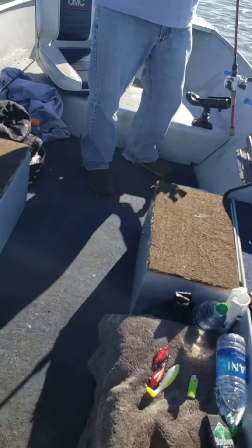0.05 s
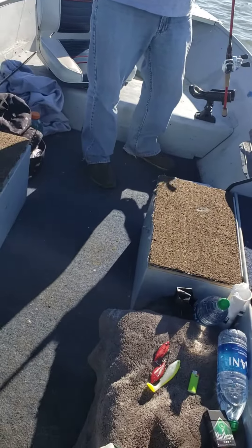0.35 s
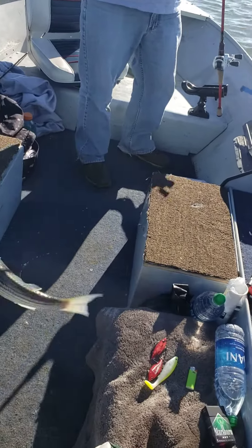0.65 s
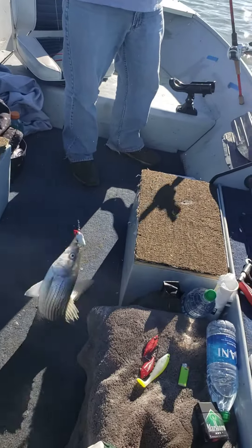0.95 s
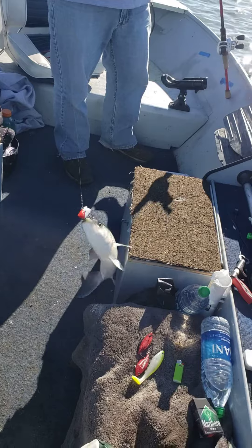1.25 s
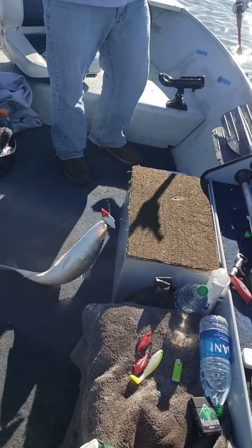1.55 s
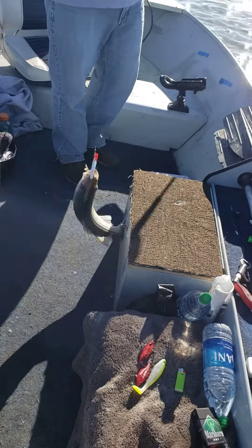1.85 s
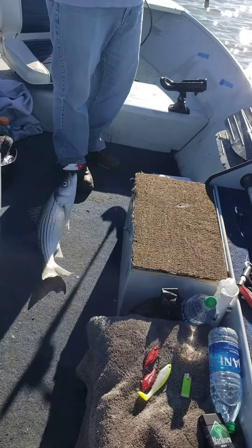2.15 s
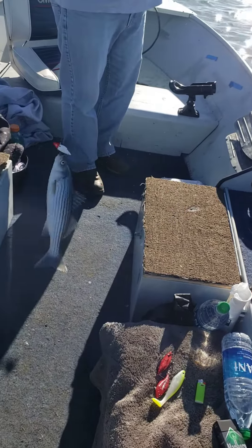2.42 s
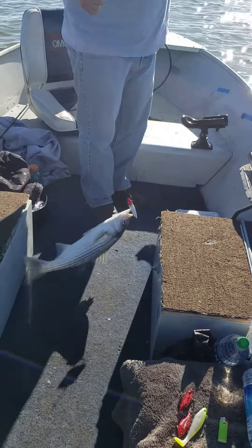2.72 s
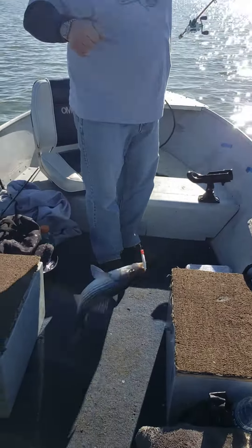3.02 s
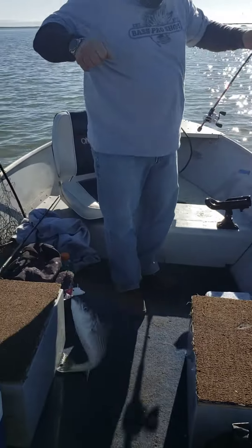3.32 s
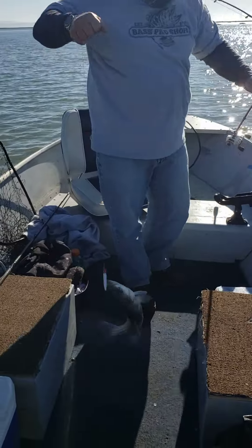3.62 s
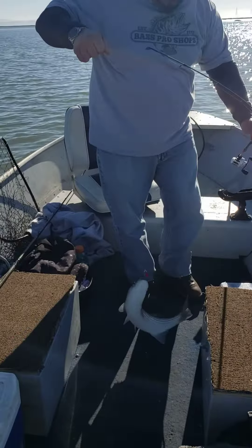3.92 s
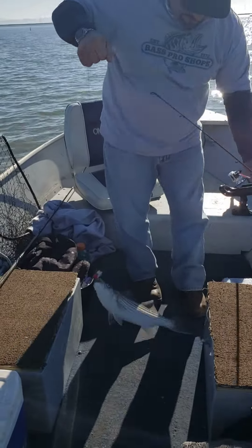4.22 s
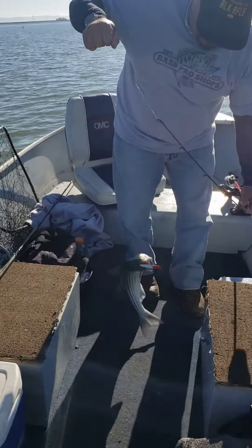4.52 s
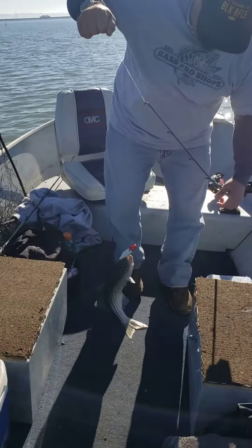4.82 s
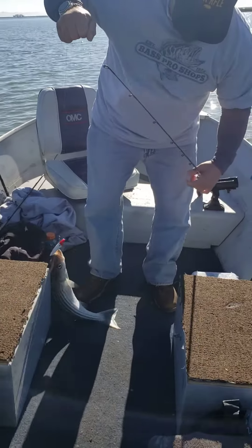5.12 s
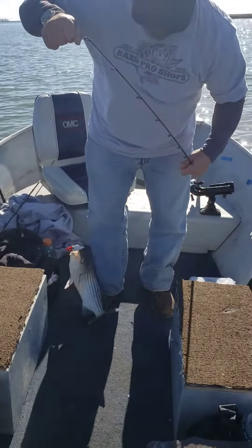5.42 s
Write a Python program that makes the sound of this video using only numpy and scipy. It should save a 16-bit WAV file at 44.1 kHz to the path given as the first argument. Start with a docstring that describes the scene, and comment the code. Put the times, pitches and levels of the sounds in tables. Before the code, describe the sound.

A hooked fish flops close by on the carpeted deck of a small metal boat, over a low, steady wash of wind and water. From the start, beads inside a hollow lure rattle in bright, uneven bursts, with sharp clicks and a faint ring of steel hooks. Around 0.3 to 0.5 seconds the rattle flares with quick knocks and a sharp wet tail smack. More knocks and slaps follow near 0.9 and 1.4 seconds, with a smack at 1.6. Deeper thumps land between 2.1 and 2.4 seconds. The heaviest pair comes at about 2.8 and 2.9, with hard clicks from the lure. The rattle continues in fits, with a hollow bump against a seat box at 4 seconds and a light knock near 4.6. It eases around 5 seconds, then flurries again from 5.3, with a few last knocks and slaps near 5.6.

```python
"""On the carpeted deck of a small metal boat, a hooked fish flops with a hollow rattle lure in its mouth.
Thrashes and flicks drive beads against the lure's shell, exciting its modes, and jangle its steel hooks.
Wind and water make a low, steady wash of noise around the hull. The body's impacts set the deck and the
seat boxes into damped vibration, and wet flank and tail slap out short bursts of noise."""
import sys
import numpy as np
from scipy import signal
from scipy.fft import rfft, irfft, next_fast_len
from scipy.io import wavfile
from scipy.ndimage import uniform_filter1d, map_coordinates

SR = 44100
rng = np.random.default_rng(int(sys.argv[2]) if len(sys.argv) > 2 else 0)


def int16_out(signal):
    """Quantize to a 16-bit WAV file."""
    q = np.round(np.clip(np.atleast_2d(signal).T, -1, 1) * 32767)
    wavfile.write(sys.argv[1], SR, q.astype(np.int16))


N = 250047

# Levels in the tables are relative; a t60 is the time to decay by 60 dB.
# Thrashes that keep the beads tumbling. Each row: start in seconds, length in seconds, level in dB.
THRASHES = [(0.0, 0.14, -32.5), (0.168, 0.056, -30.5), (0.249, 0.055, -26.5), (0.339, 0.064, -33),
            (0.436, 0.067, -23), (0.669, 0.041, -29), (0.737, 0.06, -34), (0.804, 0.028, -32),
            (0.981, 0.047, -24), (1.054, 0.03, -39), (1.143, .14, -43.5), (1.323, 0.032, -36.5),
            (1.361, 0.29, -34.5), (1.63, 0.056, -27.5), (1.812, 0.098, -34.5), (1.947, 0.024, -33),
            (2.061, 0.082, -41), (2.144, 0.065, -28), (2.352, 0.082, -28), (2.472, 0.08, -38.5),
            (2.627, .13, -44.5), (2.904, 0.054, -26.5), (2.988, 0.094, -35), (3.142, 0.07, -38.5),
            (3.272, 0.047, -30), (3.335, 0.077, -40.5), (3.443, 0.092, -34), (3.58, 0.022, -35),
            (3.669, 0.035, -28), (3.73, 0.035, -35.5), (3.844, 0.088, -38), (3.985, 0.092, -34.5),
            (4.142, 0.034, -32), (4.245, 0.036, -34), (4.349, 0.011, -31.5), (4.515, 0.032, -34.5),
            (4.601, 0.034, -31.5), (4.662, 0.08, -42.5), (4.897, 0.22, -43.5), (5.125, 0.12, -35.5),
            (5.245, 0.019, -24.5), (5.322, 0.034, -28.5), (5.387, 0.075, -24), (5.564, 0.016, -28),
            (5.622, 0.014, -30)]
# Flicks that throw the beads all at once. Each row: start in seconds, length in seconds, level in dB.
FLICKS = [(.003, 0.0047, -26), (0.085, 0.0027, -23), (0.132, .002, -29), (0.176, .004, -23),
          (0.247, 0.017, -22.5), (0.268, 0.0037, -13), (0.302, .002, -26), (.342, .003, -32),
          (0.421, 0.0041, -19), (0.447, .0035, -23.5), (0.469, 0.0038, -15.5), (0.479, .004, -18.5),
          (0.492, 0.0046, -20), (0.552, .0017, -24.5), (0.565, 0.003, -22.5), (0.573, 0.0019, -30),
          (0.584, .001, -34), (0.613, 0.0026, -23.5), (0.621, 0.0068, -24), (0.68, 0.0036, -32),
          (.696, .002, -31), (0.724, 0.0049, -18.5), (0.744, 0.0044, -23), (0.774, 0.009, -25),
          (0.806, .003, -27.5), (0.832, .003, -41), (.887, .0017, -36), (0.912, .002, -38),
          (0.92, .002, -34.5), (0.939, .002, -30), (0.981, 0.0081, -18.5), (1.012, .006, -30),
          (1.146, .002, -35), (1.156, .007, -29.5), (1.262, .002, -38.5), (1.31, .002, -45),
          (1.369, 0.0086, -24), (1.425, .003, -28), (1.544, .002, -50), (1.575, 0.0054, -26.5),
          (1.625, .003, -27), (1.652, .004, -22), (1.819, 0.0049, -26.5), (1.831, .0005, -26),
          (1.856, 0.004, -22), (1.885, 0.0023, -25), (1.953, .001, -30.5), (1.974, .007, -25),
          (2.08, .003, -28), (2.108, .002, -29), (2.152, .004, -25), (2.247, 0.014, -24.5),
          (2.343, 0.0046, -27), (2.381, 0.0045, -26.5), (2.432, 0.0036, -25), (2.475, .002, -33),
          (2.497, .002, -35), (2.532, .004, -34), (2.732, 0.0034, -38), (2.844, 0.0056, -31.5),
          (2.858, 0.0053, -13.5), (2.918, 0.0019, -9.5), (2.974, 0.0037, -25.5), (3.02, .002, -34.5),
          (3.069, 0.0026, -23.5), (3.172, 0.0081, -22.5), (3.272, .002, -25.5), (3.282, .005, -21.5),
          (3.472, .004, -25.5), (3.508, 0.0038, -25.5), (3.664, 0.003, -27), (3.69, 0.0031, -29.5),
          (3.846, .002, -39), (3.89, 0.0043, -27.5), (3.983, .002, -40), (4.014, 0.004, -15.5),
          (4.043, 0.0026, -20), (4.14, .002, -33), (4.164, .004, -24.5), (4.251, .002, -37),
          (4.347, 0.0027, -29), (4.368, 0.0046, -26.5), (4.419, 0.0022, -33), (4.483, .001, -42.5),
          (4.52, 0.0027, -37.5), (4.608, .003, -26), (4.697, .002, -39), (4.721, 0.0045, -27.5),
          (5.033, .002, -35.5), (5.115, 0.0024, -35.5), (5.246, .003, -33), (5.322, 0.0028, -21.5),
          (5.39, .005, -19), (5.398, .003, -24), (5.415, 0.0059, -14), (5.431, .004, -21.5),
          (5.444, 0.0048, -20), (5.504, 0.0047, -29), (5.544, 0.0059, -18), (5.587, 0.0027, -21.5),
          (5.619, 0.0046, -23.5)]
# Weightless moments when the beads fly free. Each row: middle in seconds, length in seconds.
FREE_FLIGHTS = [(0.537, 0.029), (0.596, 0.014), (0.72, 0.01), (0.885, 0.016), (1.127, 0.025),
                (1.753, 0.047), (2.334, 0.011), (3.249, 0.013), (3.441, 0.0081), (3.783, 0.033),
                (3.965, 0.012), (4.105, 0.0045), (4.229, 0.0082), (4.34, 0.018), (4.466, 0.011),
                (5.103, 0.096), (5.285, 0.033), (5.538, 0.0083)]
# The lure shell's modes in four groups, low to high. Each row: frequency in Hz, width in Hz, level in dB.
HOLLOW_MODES = [(2120, 670, -7), (3220, 1700, -4.5), (4870, 5400, 5.5)]
DEEP_MODES = [(5620, 650, -6), (5910, 570, -2.5), (6370, 440, -2), (7080, 470, 3), (7385, 500, 2)]
MAIN_MODES = [(9006, 490, -12), (9520, 1100, -14.5), (10746, 920, -9), (11155, 360, 0), (11340, 260, -2.5),
              (11700, 630, 2), (12160, 440, -1.5), (12560, 450, -8), (12830, 490, -1.5)]
TOP_MODES = [(13400, 1200, -1.5), (14740, 390, 1), (14400, 790, 0), (15550, 420, -10)]
# The shell's timbre as the lure turns. Each row: time in seconds, then the weights of the hollow, deep
# and top modes in dB against the main modes.
SHELL_TIMBRE = [(0.06, -24.5, -11.5, -18), (0.19, -16, -1.5, -8), (0.27, -18, -9.5, -11),
                (0.47, -21, -6.5, -6), (0.565, -30, -8.5, -13), (0.62, -17, -6, -7.5),
                (0.69, -21, -9.5, -8), (0.79, -25, -4.5, -7), (1.07, -23, -10, -6), (2.19, -19, -7, -8.5),
                (2.26, -18.5, -2.5, -4.5), (2.37, -23, -6, -7), (2.7, -14.5, -6.5, -7),
                (2.865, -29.5, -11.5, -16), (3.29, -20, -8.5, -13.5), (3.49, -14, -4, -8.5),
                (4.017, -44, -11, -18), (4.16, -23, -12.5, -21), (4.37, -34, -11.5, -16),
                (4.53, -22.5, -7.5, -13), (4.72, -20, -9, -12), (5.16, -21.5, -7.5, -11),
                (5.34, -31, -15.5, -11), (5.55, -22.5, -7.5, -17)]
# The steel hooks' modes. Each row: frequency in Hz, width in Hz, level in dB.
HOOK_MODES = [(1857, 33, -0.5), (2843, 27, -1), (3100, 24, 4.5), (3280, 57, 2.5), (3489, 19, 2),
              (3660, 40, 0), (4550, 38, 2.5)]
# The thin metallic ring near 3 kHz over time. Each row: time in seconds, level in dB against the rattle.
METALLIC_RING_LEVEL = [(0, -25), (1.05, -29), (1.25, -42), (2.6, -29.5), (2.9, -33.5), (3.6, -25.5),
                       (4.1, -26), (4.4, -26.5), (5.67, -30.5)]
# The spectrum of wind and water. Each row: frequency in Hz, spectral density in dB.
WASH_SPECTRUM = [(20, 11.5), (35, -14), (50, 4.5), (80, -0.5), (130, 1.5), (200, 0), (300, -9.5),
                 (480, -12.5), (750, -21.5), (1200, -27.5), (2000, -24.5), (3500, -36), (8000, -38),
                 (16000, -81)]
# The slow drift of the wash. Each row: time in seconds, level in dB.
WASH_DRIFT = [(0, -41), (.9, -41), (1.5, -39), (1.85, -41.5), (3.85, -39.5), (4.9, -42), (5.67, -38)]
# The likeness of the wash at the two ears. Each row: frequency in Hz, correlation coefficient.
WASH_COHERENCE = [(40, 0.3), (100, 0.48), (300, 0.83), (700, 0.014), (2000, 0.044)]
# The deck's low booming and higher knocking modes. Each row: frequency in Hz, level in dB, t60 in seconds.
BOOM_MODES = [(60, -14, 0.041), (86.4, 2.5, 0.13), (102, -3, 0.11)]
KNOCK_MODES = [(165.3, 4, 0.11), (203.3, 7, 0.047), (226.5, -1, 0.15), (274, -14.5, 0.27),
               (315, -1.5, 0.057), (395, -8, 0.1), (480, -15, 0.087), (717, -23, 0.17), (795, -18, 0.1),
               (893, -10.5, 0.042), (1045, -19, 0.06)]
# The body landing on the deck. Each row: start in seconds, then boom, knock and wet slap levels in dB.
BODY_LANDINGS = [(0.259, -47, -26.5, -32.5), (0.286, -25, -26, -39), (0.372, -44, -22, -50),
                 (0.402, -23.5, -24.5, -27), (0.439, -35, -28, -40), (0.463, -46, -24.5, -39),
                 (0.936, -50, -19.5, -40), (0.955, -21.5, -27, -52), (1.367, -28, -28, -44),
                 (1.413, -38, -20, -45), (1.431, -29, -26, -61), (1.475, -27.5, -27.5, -44),
                 (2.122, -8, -20, -29), (2.159, -25, -32, -60), (2.236, -18, -27, -39.5),
                 (2.401, -15.5, -25, -43.5), (2.81, -2.5, -14, -34), (2.918, -13.5, -19, -28),
                 (4.021, -48, -24.5, -34), (4.042, -52, -27.5, -51), (4.642, -37, -26.5, -54),
                 (5.245, -35, -34, -42.5), (5.57, -30.5, -20.5, -37.5), (5.591, -44, -27, -49),
                 (5.62, -50, -24.5, -59)]
# Smacks and swishes of tail and fins, and the flank scraping over the carpet. Each row: start in seconds, level
# in dB, t60 in seconds, # centre frequency in Hz, spread in octaves.
SMACKS_AND_SCRAPES = [(0.359, -17.5, 0.055, 3260, 0.73), (.365, -32, 0.23, 900, 1.3),
                      (0.402, -9, 0.014, 1880, 0.98), (0.407, -36, 0.037, 465, 0.64),
                      (0.417, -29, 0.031, 1400, 1.3), (0.934, -27.5, 0.028, 1800, 0.67),
                      (1.408, -32.5, 0.038, 1740, 0.48), (1.646, -22.5, 0.07, 1660, 1.9),
                      (2.03, -41, 0.16, 2510, 0.87), (2.13, -44.5, 0.8, 4620, 0.23), (2.24, -34, 0.091, 5050, .25),
                      (2.371, -43.5, 0.77, 4550, 0.17), (2.811, -33, 0.035, 2420, 1),
                      (2.92, -23, 0.025, 2050, 0.55), (3.739, -35, 0.067, 1410, 0.16),
                      (4.249, -48, 0.69, 2230, 1.8), (5.316, -27, 0.024, 2300, 0.16)]
# The hollow seat boxes' modes. Each row: frequency in Hz, level in dB, free t60 in seconds.
BOX_MODES = [(240, -5.5, 0.21), (335.2, -1, 0.21), (433, -9.5, 0.13), (486, 1.5, 0.053), (665, -13, 0.12),
             (769, -20.5, 0.29), (880, -15, .13), (1182, -45, 0.23)]
# The fish bumping the boxes. Each row: start in seconds, level in dB, tilt in dB per octave,
# ring time as a fraction of the free t60.
BOX_BUMPS = [(.366, -32.5, 4, .9), (.404, -35, 7, 1), (.461, -34, 3, 0.59), (1.414, -35, -9, 1),
             (2.125, -37, 0, 0.43), (2.811, -30, -1, .3), (2.92, -23, 5, .35), (4.02, -26, 0.5, 0.5),
             (4.042, -35, -5, 1), (5.572, -37.5, 4, 1), (5.592, -35, 4, 0.74)]
# Reverberation between the hull's walls. Each row: frequency in Hz, t60 in seconds.
HULL_DECAY = [(100, 0.022), (1000, 0.033), (6000, 0.18), (14000, 0.039)]


def amp(db):
    """Amplitude ratio of a level in decibels."""
    return 10 ** (np.asarray(db) / 20)


def unit(x):
    """Normalisation to an rms of 1."""
    return x / np.sqrt(np.mean(x ** 2) + 1e-20)


def along(points, hz):
    """Interpolation of (Hz, value) points on a logarithmic frequency axis."""
    f, values = np.transpose(points)
    return np.interp(np.log(hz + 1), np.log(f + 1), values)


def wobble(rate):
    """Smooth random modulation, with rate knots a second."""
    knots = rng.standard_normal(int(N * rate / SR) + 4)
    return map_coordinates(knots, [np.arange(N) * rate / SR])


def filtered(x, response):
    """Linear filtering: the spectrum is multiplied by a frequency response."""
    n = x.shape[-1]
    padded = next_fast_len(n + SR // 2)
    return irfft(rfft(x, padded) * response(np.fft.rfftfreq(padded, 1 / SR)), padded)[..., :n]


def add(track, start, sound):
    """Superposition of a sound on a track, from start seconds."""
    part = track[round(start * SR):][:len(sound)]
    part += sound[:len(part)]


def fade(t, t60):
    """Exponential decay by 60 dB in t60 seconds; the gain is 1 before t = 0."""
    return np.exp(-np.log(1000) * np.maximum(t, 0) / t60)


def local_rms(x, span_s):
    """Running rms over about span_s seconds, both channels together."""
    window = signal.windows.hann(2 * int(span_s * SR) + 1)
    power = np.mean(np.atleast_2d(x) ** 2, axis=0)
    return np.sqrt(abs(signal.fftconvolve(power, window / window.sum(), 'same')) + 1e-9)


def stray_beads(ticks_per_s=60):
    """A Poisson process: stray beads tick above the swarm, giving a power factor of mean 1."""
    ticks = (rng.random(N) < ticks_per_s / SR) * amp(4) * rng.uniform(0.77, 1.7, N)
    decay = fade(np.arange(SR // 10) / SR, t60=0.015)
    power = 1 + abs(signal.fftconvolve(ticks ** 2, decay ** 2)[:N])
    return power / power.mean()


def bead_power(clump_db=3.5, swarm_db=-1.0, settle_db=-9.5, lull_db=-20):
    """Incoherent impacts add in power: thrashes swell and settle, dip in free flight, and flicks spike."""
    t, power = np.arange(N) / SR, np.zeros(N)
    for start, length, db in THRASHES:
        near = slice(max(0, int((start - .1) * SR)), int((start + 1) * SR))
        age = t[near] - start
        rise = fade(-age, t60=0.071)
        stop = fade(age - length, t60=0.15)
        rolling_on = amp(settle_db) * fade(age - length, t60=0.59)
        power[near] += (amp(db) * rise * np.maximum(stop, rolling_on)) ** 2
    power *= stray_beads() * amp(swarm_db + clump_db * wobble(110)) ** 2  # the beads arrive in clumps
    for middle, length in FREE_FLIGHTS:
        near = abs(t - middle) < 2 * length
        dip = np.exp(-(2 * (t[near] - middle) / length) ** 2)
        power[near] *= amp(lull_db * dip) ** 2
    for start, length, db in FLICKS:
        near = slice(max(0, int((start - .1) * SR)), int((start + .2) * SR))
        age = t[near] - start
        power[near] += (amp(db) * fade(-age, t60=0.012) * fade(age - length, t60=0.033)) ** 2
    return power


def shell_ring(hits, modes, spot_db=4, turn_db=3.5, independent=0.55):
    """Modal excitation: each hit lands on another spot, so it has its own mix of modes on each side."""
    out, at = np.zeros((2, N)), np.flatnonzero(hits)
    for hz, width, db in modes:
        shared = rng.choice([-1, 1], len(at)) * amp(spot_db * rng.standard_normal(len(at)))
        separate = rng.standard_normal((2, len(at)))
        blows = np.zeros((2, N))
        blows[:, at] = hits[at] * (np.sqrt(1 - independent) * unit(shared) + np.sqrt(independent) * separate)
        mode = filtered(blows, lambda f: (1j * f * width / (hz * hz - f * f + 1j * f * width)) ** 2)
        out += unit(mode) * amp(db + turn_db * wobble(12))  # each swing favours other modes
    return unit(out)


def turning(x, patchy_db=4.5):
    """Directivity: the twisting lure radiates unevenly, so narrow patches of its spectrum flare and fade."""
    spectra = signal.stft(x, nperseg=256)[2]
    patches = uniform_filter1d(rng.standard_normal(spectra.shape[1:]), size=2, axis=0)  # across frequency
    patches = uniform_filter1d(patches, size=9, axis=1)  # across time
    return signal.istft(spectra * amp(patchy_db * unit(patches)), nperseg=256)[1][:, :N]


def hook_jangle(power):
    """Lightly damped resonance: every throw jolts the steel hooks, which ring on after it."""
    def steel(f):
        return sum(amp(db) * 1j * f * np.sqrt(width) / (hz * hz - f * f + 1j * f * width)
                   for hz, width, db in HOOK_MODES)

    rms_gain = np.sqrt(np.mean(abs(steel(np.fft.rfftfreq(N, 1 / SR))) ** 2))
    jolts = (rng.standard_normal(N) + .5 * rng.standard_normal((2, N))) * np.sqrt(power)
    ring_gain = amp(np.interp(np.arange(N) / SR, *np.transpose(METALLIC_RING_LEVEL)))
    return filtered(jolts * ring_gain, steel) / rms_gain


def lure_rattle(hits_per_s=1000, size_db=4.5, medium_db=-30.5, loss_per_db=0.12):
    """Impact excitation: beads click on the shell, brighter when they hit harder, and the hooks jangle."""
    t, power = np.arange(N) / SR, bead_power()
    times, *timbre = np.transpose(SHELL_TIMBRE)
    hollow, deep, top = (np.interp(t, times, db) for db in timbre)
    hardness_db = 10 * np.log10(power + amp(medium_db) ** 2 / 100) - medium_db
    loss_db = loss_per_db * hardness_db
    shares = amp([hollow - loss_db, deep - loss_db, np.zeros(N), top]) ** 2
    hits = (rng.random(N) < hits_per_s / SR) * amp(size_db * rng.standard_normal(N))
    out = turning(hook_jangle(power))
    groups, gains_db = (HOLLOW_MODES, DEEP_MODES, MAIN_MODES, TOP_MODES), (3.5, 2.15, 0.0, 2.2)
    for modes, db, group_power in zip(groups, gains_db, power * shares / shares.sum(0)):
        clicks = turning(shell_ring(hits, modes))
        # the beads share the energy of a throw, in a few hard hits or many soft ones
        out += amp(db) * np.sqrt(group_power) * clicks / local_rms(clicks, span_s=0.0023)
    return out


def wind_and_water(gain_db=1.97, swell_db=1, lap_db=3.0):
    """Partly coherent noise: alike at both ears in the bass, diffuse above; the low part laps unevenly."""
    def mid_and_side(hz):
        angle = np.arccos(np.clip(along(WASH_COHERENCE, hz), -1, 1)) / 2
        return amp(along(WASH_SPECTRUM, hz)) * [np.cos(angle), np.sin(angle)]

    mid, side = filtered(rng.standard_normal((2, N)), mid_and_side)
    wash = unit(np.array([mid + side, mid - side]))
    low = filtered(wash, lambda hz: 1 / (1 + (hz / 450) ** 4))
    lapping = low * amp(lap_db * wobble(35))
    drift_db = np.interp(np.arange(N) / SR, *np.transpose(WASH_DRIFT))
    return (wash - low + lapping) * amp(drift_db + gain_db + swell_db * wobble(10))


def deck_thumps(boom_attack_s=0.013, knock_attack_s=0.0053, rest_s=0.036, scatter_db=1.5, detune=0.045):
    """Damped panel modes: the soft body loads the deck slowly, so the boom swells in behind the knock."""
    out, t = np.zeros(N), np.arange(SR // 3) / SR
    pressed = fade(t - rest_s, t60=0.19)  # the body comes to rest on the panel and damps it
    for start, boom_db, knock_db, _ in BODY_LANDINGS:
        boom = sum(amp(db) * fade(t, t60) * np.sin(2 * np.pi * hz * t) for hz, db, t60 in BOOM_MODES)
        knock = np.zeros(len(t))
        for hz, db, t60 in KNOCK_MODES:
            strength, shift, phase = rng.standard_normal(3)
            tone = np.sin(2 * np.pi * (hz * (1 + detune * shift) * t + phase))
            knock += amp(db + scatter_db * strength) * fade(t, t60) * tone
        add(out, start, amp(boom_db + 1.5) * boom * pressed * (1 - np.exp(-(t / boom_attack_s) ** 2)))
        add(out, start, amp(knock_db - 7.0) * knock * pressed * (1 - np.exp(-t / knock_attack_s)))
    return out


def wet_slaps(attack_s=0.0026, spatter_db=4, independent=0.68, flank_t60=0.06, flank_hz=665, flank_octaves=1):
    """Impact noise: wet skin smacks carpet and boxes in spattering bursts, partly different on each side."""
    out, t = np.zeros((2, N)), np.arange(SR // 4) / SR
    flank_slaps = [(start, db, flank_t60, flank_hz, flank_octaves) for start, _, _, db in BODY_LANDINGS]
    for start, db, t60, hz, octaves in flank_slaps + SMACKS_AND_SCRAPES:
        shared = np.sqrt(1 - independent) * rng.standard_normal(len(t))
        separate = np.sqrt(independent) * rng.standard_normal((2, len(t)))
        spatter = (shared + separate) * amp(spatter_db * rng.standard_normal(len(t)))
        burst = filtered(spatter, lambda f: 1 / (1 + (np.log2((f + 1) / hz) / (2 * octaves)) ** 2) ** 4)
        for track, side in zip(out, unit(burst)):
            add(track, start, amp(db) * side * fade(t, t60) * (1 - np.exp(-t / attack_s)))
    return out


def seat_boxes(attack_s=0.0028, scatter_db=2.5):
    """Damped vibration: each bump rings a seat box with its own brightness and ring time."""
    out, t = np.zeros(N), np.arange(SR // 3) / SR
    pivot_hz = BOX_MODES[1][0]
    for start, level_db, tilt_db, ring_share in BOX_BUMPS:
        note = np.zeros(len(t))
        for hz, db, t60 in BOX_MODES:
            strength, phase = rng.standard_normal(2)
            gain = amp(db + tilt_db * np.log2(hz / pivot_hz) + scatter_db * strength)
            note += gain * fade(t, t60 * ring_share) * np.sin(2 * np.pi * (hz * t + phase))
        add(out, start, amp(level_db) * note * (1 - np.exp(-t / attack_s)))
    return out


def in_boat(x, left_lag_ms, left_db, wet_db):
    """Interaural time and level differences place a source; the hull's walls add a short reverberation."""
    direct = filtered(x, lambda f: np.exp(1j * np.pi * f * left_lag_ms / 1000 * np.array([[-1], [1]])))
    hz, t, spectra = signal.stft(rng.standard_normal((2, SR // 4)), SR, nperseg=256)
    response = signal.istft(spectra * fade(t, along(HULL_DECAY, hz)[:, None]), SR, nperseg=256)[1]
    response /= np.linalg.norm(response[0])
    diffuse = signal.fftconvolve(np.atleast_2d(x), response, axes=1)[:, :N]
    balance = amp([[left_db / 2], [-left_db / 2]])
    return (direct + amp(wet_db) * diffuse) / np.hypot(1, amp(wet_db)) * balance


def scene():
    """Superposition of lure, deck and fish in the open boat, over wind and water."""
    lure = in_boat(lure_rattle(), left_lag_ms=0.39, left_db=1.4, wet_db=-13)
    deck = in_boat(deck_thumps() + seat_boxes(), left_lag_ms=0.19, left_db=1.0, wet_db=-22)
    slaps = in_boat(wet_slaps(), left_lag_ms=0.19, left_db=-1.1, wet_db=-6)
    return lure + deck + slaps + wind_and_water()


def record(dry, low_hz=38, top_hz=15850):
    """Band limiting and soft saturation: the deepest bass and top treble go, the highest peaks round off."""
    thinned = signal.sosfilt(signal.butter(2, low_hz, 'high', fs=SR, output='sos'), dry)
    rounded = thinned / (1 + thinned ** 4) ** (1 / 4)
    return filtered(rounded, lambda hz: hz < top_hz)


dry = scene()
out = record(dry)
int16_out(out)
```